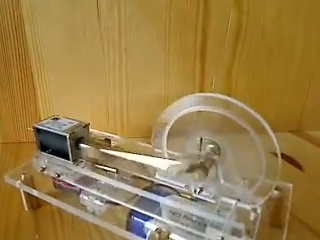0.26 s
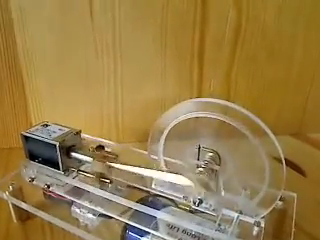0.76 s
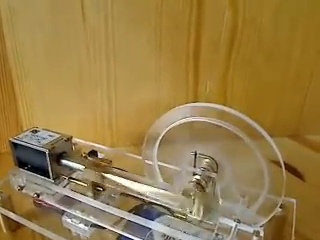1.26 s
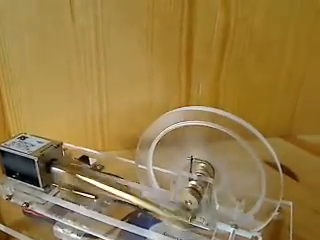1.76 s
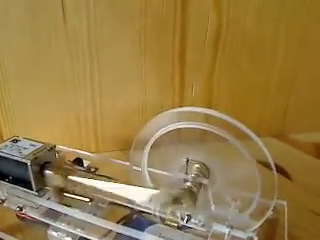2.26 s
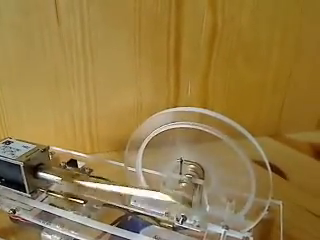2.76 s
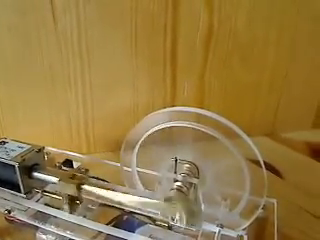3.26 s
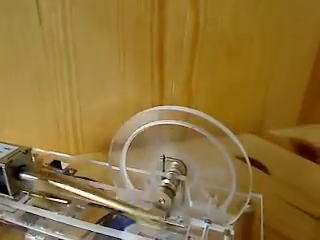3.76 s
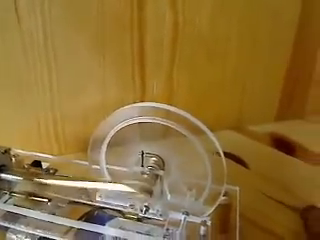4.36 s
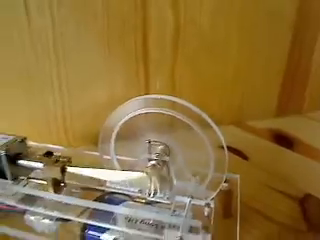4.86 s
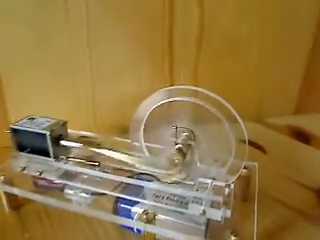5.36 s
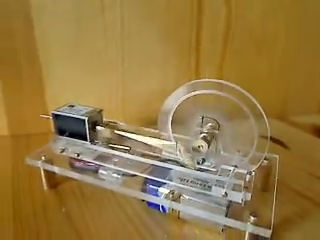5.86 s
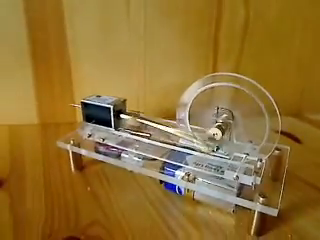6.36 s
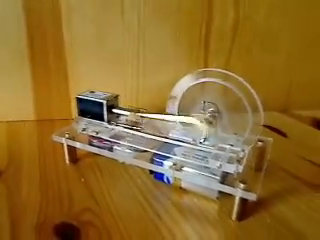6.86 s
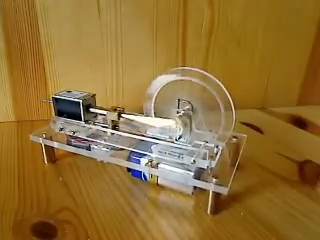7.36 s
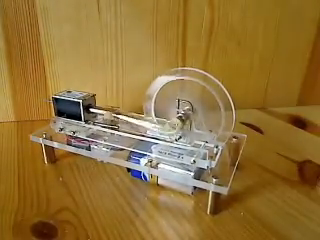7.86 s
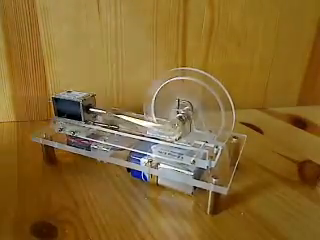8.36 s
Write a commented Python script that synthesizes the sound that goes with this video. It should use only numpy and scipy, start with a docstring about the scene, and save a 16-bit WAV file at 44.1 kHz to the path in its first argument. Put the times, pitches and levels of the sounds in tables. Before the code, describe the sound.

Fast, even metallic clacking from a tabletop model engine, each stroke a bright click with a hollow knock, ticks and buzzing loose parts.

```python
"""A bright steel clack over a woody thump comes about 7.6 times a second: a small solenoid engine on a table.
Each turn the plunger's hard contacts ring steel modes, and knocks ring the acrylic frame, plate, table and stand.
Between slams, noise bursts rattle the rod and crank, the switch wiper ticks and loose parts buzz.
The microphone moves in over the first seconds, then draws back from 4.4 s; wooden boards and a room reflect."""
import sys
import numpy as np
from scipy import signal
from scipy.fft import rfft, irfft
from scipy.io import wavfile

SR = 44100
rng = np.random.default_rng(int(sys.argv[2]) if len(sys.argv) > 2 else 0)


def unload_wav(signal):
    """Save mono or channel-first audio to the path in sys.argv[1] as 16-bit WAV at rate SR, clipped to [-1, 1]."""
    wavfile.write(
        sys.argv[1],
        SR,
        np.round(np.clip(np.atleast_2d(signal).T, -1, 1) * 32767).astype(np.int16),
    )


N = 379701  # length in samples


def undb(db):
    """Decibels to amplitude gain."""
    return 10 ** (np.asarray(db) / 20)


def butter(x, hz, kind, order=2):
    """Butterworth low- or high-pass."""
    return signal.sosfilt(signal.butter(order, min(hz, .45 * SR), kind, fs=SR, output="sos"), x)


def convolve(x, response):
    """Pass a sound through an impulse response."""
    return signal.fftconvolve(x, response)[:N]


def fade(t60):
    """Times and envelope of an exponential decay that falls 60 dB in t60 seconds."""
    t = np.arange(int(2 * t60 * SR) + 2) / SR
    return t, np.exp(-np.log(1000) * t / t60)


def curve(rows):
    """Rows (s, value) joined by straight lines, one value a sample."""
    return np.interp(np.arange(N) / SR, *np.transpose(rows))


def taps(times, db, scatter_s, scatter_db):
    """One impulse a turn, never quite alike in moment or size."""
    chance = rng.standard_normal((len(times), 2))
    at = np.round((times + scatter_s * chance[:, 0]) * SR).astype(int)
    gain = undb(db + scatter_db * chance[:, 1])
    inside = (at >= 0) & (at < N)
    return np.bincount(at[inside], gain[inside], N)


def ring(drive, modes, place):
    """Decaying sines of alternating sign, with levels blended between two listening places by place 0..1."""
    responses = np.zeros((2, SR))
    for k, (hz, t60, first_db, second_db) in enumerate(modes):
        t, envelope = fade(min(t60, .15))  # no mode rings longer than 0.15 s
        mode = (-1) ** k * envelope * np.sin(2 * np.pi * hz * t)
        responses[:, :len(t)] += undb([[first_db], [second_db]]) * mode
    first = convolve(drive, responses[0])
    second = convolve(drive, responses[1])
    return (1 - place) * first + place * second


def per_turn(times, rows, spread_db):
    """Levels of each turn: every column of a slow curve, plus a little chance."""
    at, *columns = np.transpose(rows)
    chance = rng.standard_normal((len(times), len(columns))).T
    return [np.interp(times, at, db) + spread * luck for db, spread, luck in zip(columns, spread_db, chance)]


# flywheel speed, one plunger slam a turn: start_s [s], speed [turns/s]
FLYWHEEL_SPEED = [(0.0, 7.521), (0.8, 7.515), (1.6, 7.552), (2.0, 7.497), (2.8, 7.567), (3.0, 7.465),
                  (3.4, 7.531), (4.0, 7.53), (5.0, 7.66), (5.2, 7.553), (5.6, 7.633), (6.8, 7.615),
                  (7.8, 7.636), (8.6, 7.48)]


def slam_times(first_slam_s=.0811):
    """The plunger lands whenever the flywheel completes a turn; it is already spinning at the start."""
    t = np.arange(-SR // 4, N) / SR
    turns = np.cumsum(np.interp(t, *np.transpose(FLYWHEEL_SPEED))) / SR
    turns -= np.interp(first_slam_s, t, turns)
    return t[np.searchsorted(turns, np.arange(-1, turns[-1]))]


# microphone place: start_s [s], retreat [0 close .. 1 drawn back]
MICROPHONE_RETREAT = [(0, 0.43), (1.5, 0.012), (2.5, 0), (4.398, 0), (5.0, 0.31), (5.6, 0.75), (6.5, 0.94),
                      (8.6, 1)]


def microphone_retreat():
    """Microphone place at every sample, which blends the close and far colour of each part."""
    return np.clip(curve(MICROPHONE_RETREAT), 0, 1)


# strength of the stroke, building over time: start_s [s], thump_db [dB], click_db [dB]
STROKE_STRENGTH = [(0, -3.5, -5), (.7, -1.9, -5.5), (1.6, -2.75, -3.5), (2.5, -1.55, -3.5), (4.4, -1.5, -2),
                   (5.7, -0.8, -1.5), (6.3, -1.2, -2.5), (7.3, -1.05, -0.5), (8.6, -0.6, -0.5)]


def stroke_levels(times):
    """Frame thump and steel click of each turn, uneven from stroke to stroke."""
    return per_turn(times, STROKE_STRENGTH, spread_db=[0.54, 1.1])


RATTLE_SPREAD_DB = 1.3  # turn-to-turn spread of slack joints and of loose parts

# rattle of the slack rod and crank joints: start_s [s], level_db [dB]
JOINT_SLACK = [(0, -6.5), (1.1, -3), (2.8, -4.5), (4.4, -4), (5.5, -6), (6.4, -9.5), (7.2, -4.5), (8.6, -6)]


def rattle_levels(times):
    """How hard the slack joints rattle in each turn."""
    return per_turn(times, JOINT_SLACK, [RATTLE_SPREAD_DB])[0]


# bright buzz of loose metal parts: start_s [s], level_db [dB]
METAL_LOOSENESS = [(0, 7.5), (1.5, 6.5), (4.3, 2.5), (5.4, 2.5), (6.6, 0.5), (7.5, 5.5), (8.1, 2.5),
                   (8.6, 6.5)]


def loose_levels(times):
    """How strongly the loose metal parts buzz in each turn."""
    return per_turn(times, METAL_LOOSENESS, [RATTLE_SPREAD_DB])[0]


# spectral shape of the quiet room: pitch_hz [Hz], density_db [relative dB per Hz]
ROOM_SPECTRUM = [(25, -34), (60, -20), (150, 5.5), (350, -26), (700, -3.5), (1200, -15), (2500, -23),
                 (6000, -20.5), (11000, -26.5), (13000, -37)]


def room_tone(level_db=-60):
    """Faint steady hush: random noise shaped to the room's spectrum."""
    hz, db = np.transpose(ROOM_SPECTRUM)
    bins = np.maximum(np.arange(N // 2 + 1) * SR / N, 1)
    shape = undb(np.interp(np.log(bins), np.log(hz), db))
    hush = irfft(rfft(rng.standard_normal(N)) * shape, N)
    return hush / hush.std() * undb(level_db)


def echo(x, db, t60, gap_s, dull_hz):
    """Dense reflections, a fading noise response, arrive after a short gap and lose treble."""
    t, envelope = fade(t60)
    tail = envelope * rng.standard_normal(len(t)) * (t > gap_s)
    tail /= np.sqrt(np.sum(tail ** 2))
    return undb(db) * convolve(x, butter(tail, dull_hz, "low", order=1))


def buzz(times, turn_db, db, t60, low_hz, high_hz, grain_db):
    """Loose parts chatter on after each slam: band-passed noise in coarse grains, different every turn."""
    shake = convolve(taps(times + 0.0022, turn_db + db, scatter_s=0.00046, scatter_db=0.6), fade(t60)[1])
    # each grain holds its random level for 88 samples
    grains = undb(grain_db * np.repeat(rng.standard_normal(N // 88 + 1), 88)[:N])
    chatter = butter(grains * rng.standard_normal(N), low_hz, "high", order=4)
    chatter = butter(chatter, high_hz, "low", order=4)
    return shake * chatter / chatter.std()


# table top modes: pitch_hz [Hz], t60_s [s, held to 0.15 at most], close_db [dB], drawn_back_db [dB]
TABLE_MODES = [(136.5, 0.048, -33, -30), (174, 0.055, -27, -27.5), (179.4, .25, -49.5, -41)]


def table(times, db, retreat, landing_s=0.02158, build_s=1.15):
    """The rocking frame drops back on its legs and thuds on the table top, lightly in the first turns."""
    build = np.minimum(np.arange(N) / SR / build_s, 1) ** 2
    thuds = taps(times + landing_s, db, scatter_s=0.0011, scatter_db=0.5) * build
    return ring(butter(thuds, 110, "high", order=3), TABLE_MODES, retreat)


# how squarely the microphone faces the base plate: start_s [s], facing [0 oblique .. 1 square]
PLATE_FACING = [(0, 0.2), (4.7, 0.073), (5.4, 1), (6.1, 1), (6.6, 0.028), (8.6, 0.03)]
# base plate modes, radiating unevenly: pitch_hz [Hz], t60_s [s], oblique_db [dB], square_db [dB]
PLATE_MODES = [(495, 0.13, -61, -28.5), (902, 0.083, -39, -24.5), (1038, .05, -43, -24.5),
               (1080, 0.12, -68, -33), (1598, 0.04, -31.5, -63)]


def plate(times, db, rocking_s=.025, rocking_db=-11):
    """The slam and the rocking after it ring the base plate; its colour depends on the listening direction."""
    slams = taps(times + 0.001957, db, scatter_s=.00005, scatter_db=2.5)
    rocking = taps(times + rocking_s, db + rocking_db, scatter_s=0.00042, scatter_db=2)
    return ring(slams + rocking, PLATE_MODES, np.clip(curve(PLATE_FACING), 0, 1))


# crank pin knock, coming and going with the bearing's play: start_s [s], level_db [dB]
CRANK_PIN_PLAY = [(0, -18.5), (2.2, -18), (3.0, -18), (3.6, -9.5), (4.3, -11), (5.2, -8.5), (5.7, -18.5),
                  (6.6, -25), (7.1, -14), (7.8, -22), (8.6, -20)]
# flywheel stand modes: pitch_hz [Hz], t60_s [s], close_db [dB], drawn_back_db [dB]
STAND_MODES = [(337, 0.077, -31.5, -30.5), (424, 0.043, -27, -29), (1920, 0.018, -39.5, -38),
               (2070, 0.019, -33, -58)]


def crank(times, retreat, dead_centre_s=0.067, rebound_s=.0735, rebound_hz=600):
    """At the far dead centre the pin crosses its play and knocks the flywheel stand, then rebounds softly."""
    knocks = taps(times + dead_centre_s, 0, scatter_s=0.00065, scatter_db=4)
    rebounds = taps(times + rebound_s, 0.71, scatter_s=0.0008, scatter_db=3)
    rebounds = butter(rebounds, rebound_hz, "low")
    force = (knocks + rebounds) * undb(curve(CRANK_PIN_PLAY))
    return ring(butter(force, 200, "high"), STAND_MODES, retreat)


# the springy switch wiper meets and leaves its cam: start_s [s after the slam], level_db [dB]
WIPER_CONTACTS = [(-.0257, -27), (-.0103, -9.5), (0.0176, 1), (0.0427, -9.5), (0.0512, -35)]
# switch wiper modes: pitch_hz [Hz], t60_s [s], close_db [dB], drawn_back_db [dB]
WIPER_MODES = [(3697, 0.041, -45, -41.5), (4360, 0.036, -40, -42.5), (4775, 0.049, -48, -51),
               (4946, 0.039, -43.5, -47.5), (7060, 0.0014, -33, -48), (13550, 0.00051, -20, -38)]


def wiper(times, db, retreat):
    """The switch spring ticks against its cam and sings briefly."""
    force = 0
    for delay, tick_db in WIPER_CONTACTS:
        force = force + taps(times + delay, db + tick_db, scatter_s=0.00028, scatter_db=4)
    return ring(force, WIPER_MODES, retreat)


# slack joints scrape in every turn:
# start_s [s after the slam], level_db [dB], t60_s [s], treble_db [dB, gain of the grit's bright part]
JOINT_SCRAPES = [(-.027, -55, 0.05, 1), (-.0185, -38.5, 0.08, -35), (-.0103, -30.5, 0.065, -31),
                 (-.003, -25.5, 0.046, -11), (.006, -50, 0.18, 0), (0.016, -37, 0.053, -12),
                 (0.0424, -61.5, .06, 20.5), (0.054, -46, 0.038, 11), (0.0592, -31.5, 0.053, 0.5),
                 (0.07, -69, 0.034, 27)]
# rod and crank modes: pitch_hz [Hz], t60_s [s], close_db [dB], drawn_back_db [dB]
LINKAGE_MODES = [(1938, 0.018, -21, -22), (2227, 0.017, -24.5, -34), (2510, 0.025, -29.5, -33),
                 (2937, 0.024, -21.5, -26), (3370, 0.007, -22, -28.5), (4460, 0.0043, -18.5, -30.5),
                 (8710, 0.0014, -6.5, -6.5), (9450, 0.0041, -10.5, -11), (10740, 0.002, -15, -8.5),
                 (15300, 0.0021, -27, -17.5)]


def linkage(times, db, retreat, grain_db=4):
    """Gritty bursts of sliding and rattling contact ring the rod and crank."""
    force = 0
    for delay, scrape_db, t60, treble_db in JOINT_SCRAPES:
        starts = taps(times + delay, db + scrape_db, scatter_s=0.00072, scatter_db=1.0)
        pressure = convolve(starts, fade(t60)[1])
        # each grain holds its random level for 20 samples
        grains = undb(grain_db * np.repeat(rng.standard_normal(N // 20 + 1), 20)[:N])
        grit = rng.standard_normal(N) * grains
        grit /= grit.std()
        dull = butter(grit, 2200, "low", order=1)
        force = force + pressure * (dull + undb(treble_db) * (grit - dull))
    return ring(force, LINKAGE_MODES, retreat)


# pushes on the frame (coil pull, slam, rocking, far dead centre):
# start_s [s after the slam], level_db [dB], hardness_hz [Hz, higher is harder]
FRAME_KNOCKS = [(-.019, -24, 720), (-.0105, -24, 1250), (-.006, -34, 468), (0, 1, 40000), (.00121, 3, 253),
                (.00785, -4.5, 557), (0.0169, 5.5, 206), (0.021, -15, 981), (0.0268, -1, 300),
                (0.037, -23, 1516), (0.063, -38.5, 500), (0.078, -31.5, 700)]
# acrylic frame modes: pitch_hz [Hz], t60_s [s], close_db [dB], drawn_back_db [dB]
FRAME_MODES = [(165, 0.045, -48, -21), (198, 0.034, -22, -17.5), (236.2, 0.022, -14.5, -12),
               (264.9, 0.12, -18, -17), (317.7, 0.08, -19.5, -23.5), (421.8, 0.059, -12, -13.5),
               (423.7, 0.095, -17, -19), (529.1, 0.081, -18, -24.5), (574.2, 0.11, -27, -38.5),
               (639.3, 0.1, -25.5, -22), (771, 0.11, -28, -56), (860, 0.0082, -10, -21.5),
               (907.6, 0.074, -21.5, -36.5), (1057, 0.088, -37.5, -32), (1105, 0.022, -25, -26.5),
               (1432, 0.0089, -20.5, -69), (1550, 0.011, -19.5, -25), (2012, 0.01, -14.5, -18),
               (2022, 0.014, -19, -24), (2166, 0.0088, -24.5, -39), (2716, 0.0079, -25.5, -36),
               (2936, 0.0088, -22, -34.5), (3435, 0.0083, -16.5, -26.5), (4400, 0.014, -23.5, -30)]


def frame(times, db, retreat):
    """The slam and the softer pushes around it ring the acrylic plates; softer contact means duller force."""
    force = 0
    for delay, knock_db, hardness_hz in FRAME_KNOCKS:
        pole = np.exp(-2 * np.pi * hardness_hz / SR)
        # knocks further from the slam are less regular
        scatter_db = min(0.82 + 35 * abs(delay), 2)
        blow = taps(times + delay, db + knock_db, 0.0061 * abs(delay), scatter_db)
        force = force + signal.lfilter([(1 - pole) ** 2], [1, -2 * pole, pole ** 2], blow)
    # so small a plate radiates little bass
    return ring(butter(force, 188, "high", order=3), FRAME_MODES, retreat)


# the plunger chatters, rebounds and lands again, steel on steel: start_s [s after the slam], level_db [dB]
PLUNGER_CONTACTS = [(0, 1), (.00024, 6), (.00061, 3), (.00102, -2), (.0016, -8), (.0045, -15), (.005, -2),
                    (.0056, -29)]
# plunger and coil yoke modes: pitch_hz [Hz], t60_s [s], close_db [dB], drawn_back_db [dB]
STEEL_MODES = [(8200, 0.0032, -16, -30.5), (8680, 0.0087, -19.5, -30.5), (9430, 0.0029, -16.5, -21),
               (10626, 0.0084, -18.5, -21), (11660, 0.005, -19, -32.5), (12100, 0.0046, -33, -38),
               (13100, 0.003, -19, -24.5), (14200, 0.0032, -32, -29), (15300, 0.013, -30, -31.5)]


def plunger(times, db, retreat):
    """A few hard contacts in quick succession ring the steel: the bright edge of the clack."""
    force = 0
    for delay, contact_db in PLUNGER_CONTACTS:
        force = force + taps(times + delay, db + contact_db, scatter_s=.000006, scatter_db=.5)
    return butter(ring(force, STEEL_MODES, retreat), 8940, "high", order=4)


def scene():
    """The running engine, the boards around it and the room."""
    times = slam_times()
    thump_db, click_db = stroke_levels(times)
    rattle_db = rattle_levels(times)
    loose_db = loose_levels(times)
    retreat = microphone_retreat()

    body = table(times, thump_db, retreat) + plate(times, thump_db)
    body = body + crank(times, retreat) + frame(times, thump_db, retreat)
    metal = wiper(times, thump_db, retreat) + linkage(times, rattle_db, retreat)
    metal = metal + plunger(times, click_db, retreat)

    panels = buzz(times, thump_db, db=-37, t60=0.17, low_hz=570, high_hz=1304, grain_db=4.0)
    panels = undb(4.1 * retreat) * panels  # stronger from further back
    screws = buzz(times, thump_db + loose_db, db=-45, t60=0.15, low_hz=2980, high_hz=4840, grain_db=4.5)
    yoke = buzz(times, click_db + loose_db, db=-38, t60=0.08, low_hz=9200, high_hz=13000, grain_db=2.5)

    engine = body + metal + panels + screws + yoke
    boards = echo(butter(body, 1390, "high"), db=-2, t60=0.03, gap_s=0.00072, dull_hz=6100)
    room = echo(engine, db=-18, t60=.09, gap_s=.01, dull_hz=2600)
    return (engine + boards + room + room_tone())[None]


def record(dry, headroom=.7, top_hz=16000):
    """The recorder rounds the sharpest peaks and cuts the top."""
    rounded = headroom * np.tanh(dry / headroom)
    return signal.sosfilt(signal.ellip(8, .2, 80, top_hz, fs=SR, output="sos"), rounded)


dry = scene()
out = record(dry)
unload_wav(out)
```